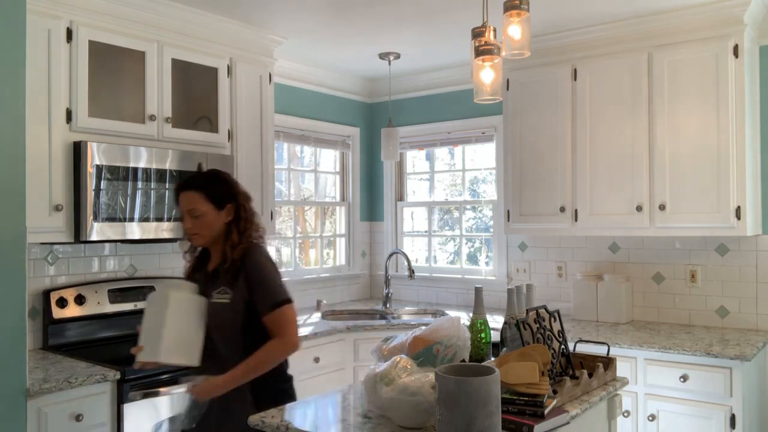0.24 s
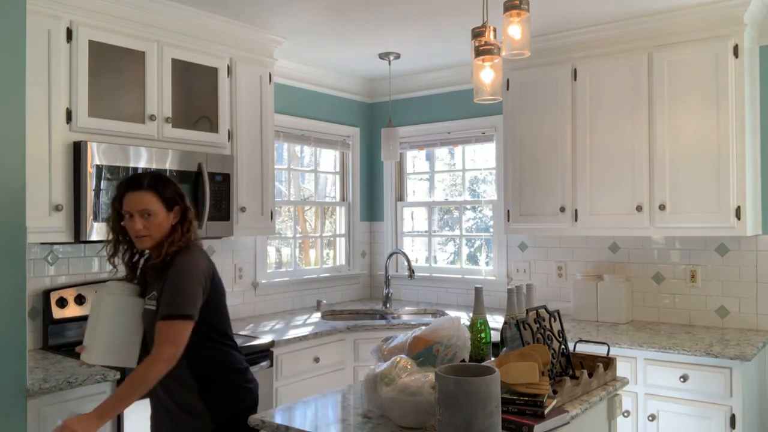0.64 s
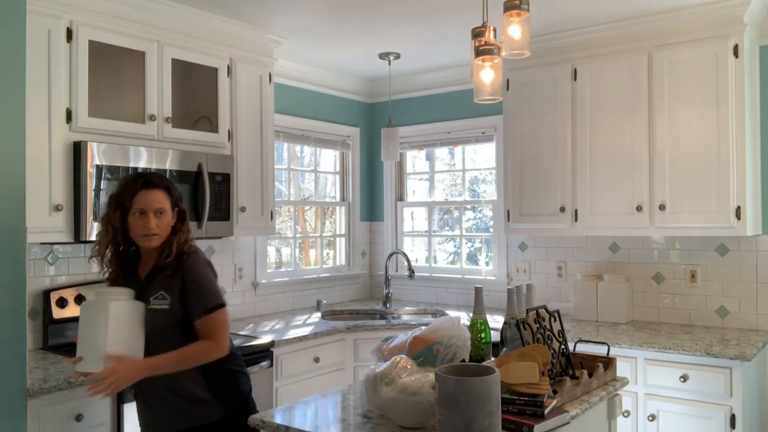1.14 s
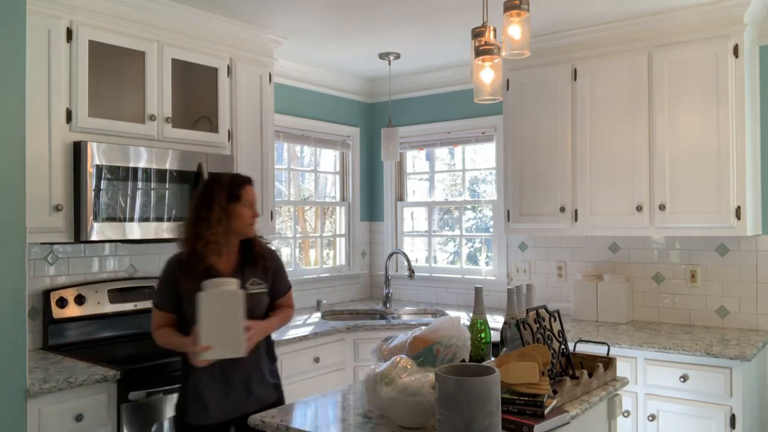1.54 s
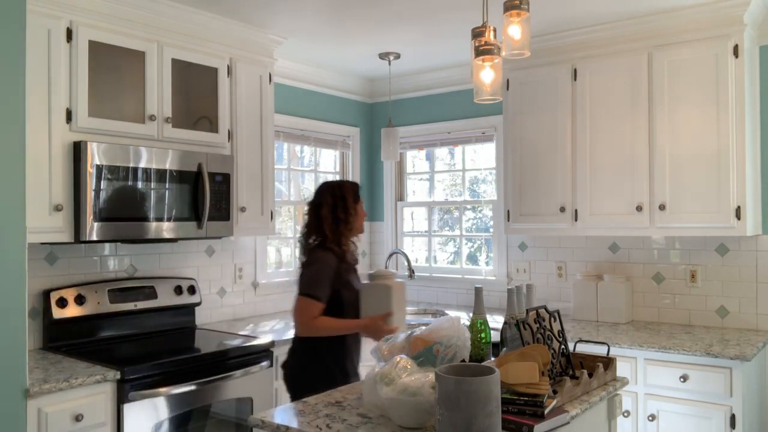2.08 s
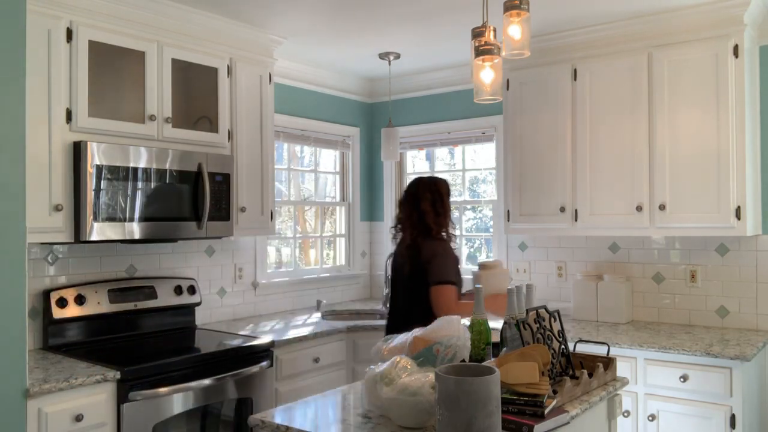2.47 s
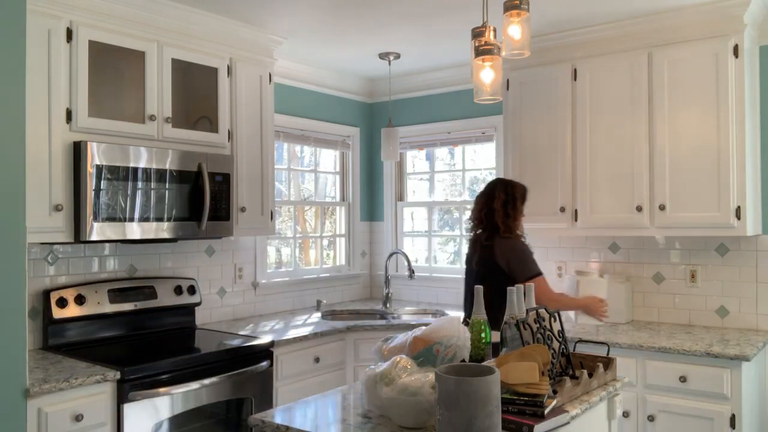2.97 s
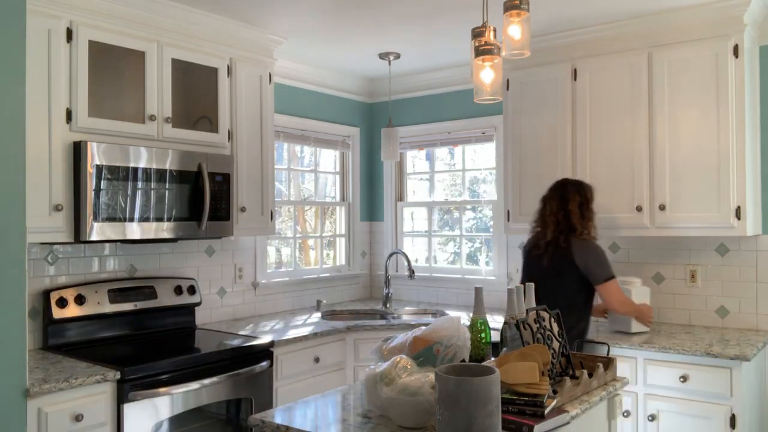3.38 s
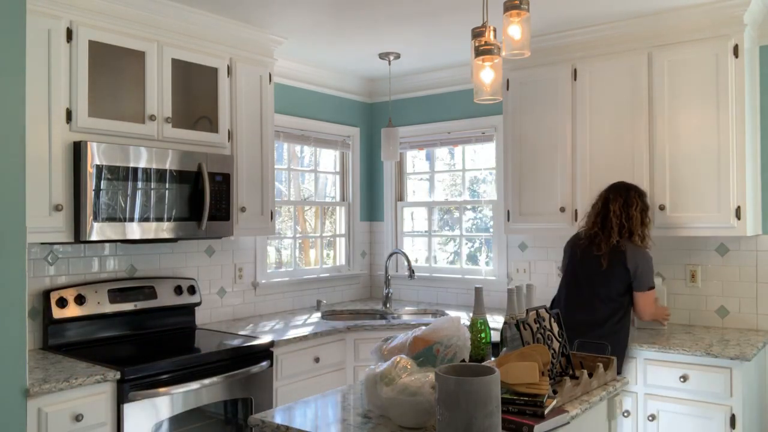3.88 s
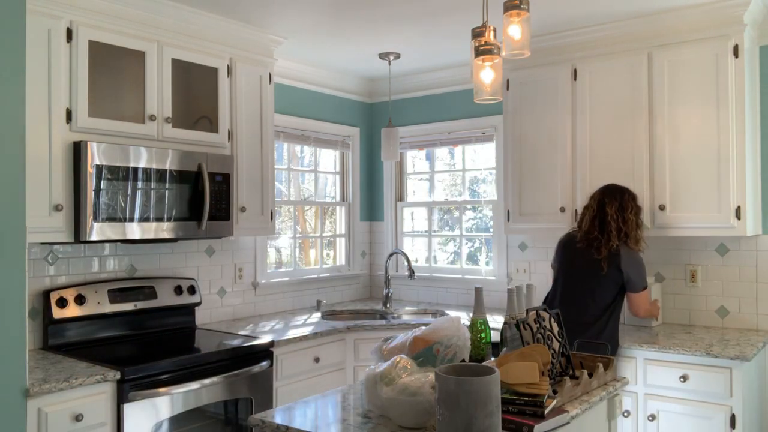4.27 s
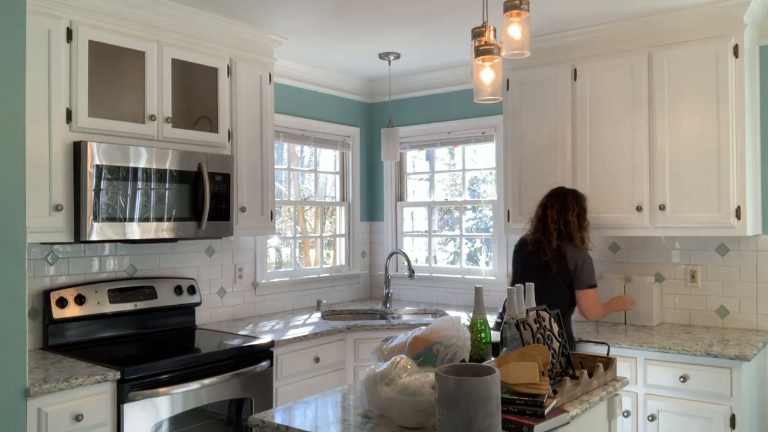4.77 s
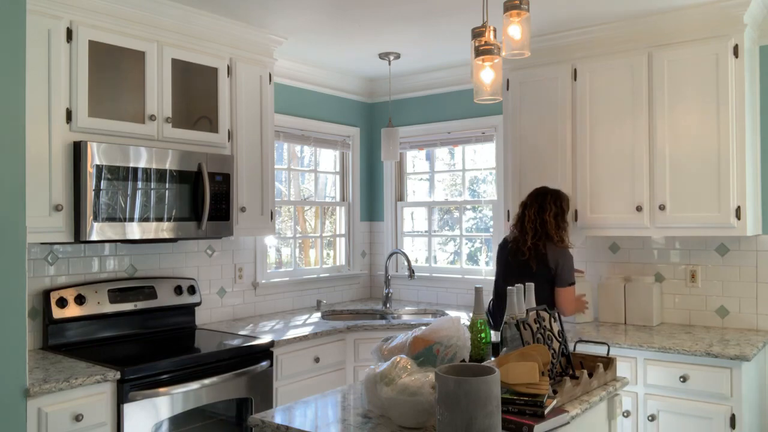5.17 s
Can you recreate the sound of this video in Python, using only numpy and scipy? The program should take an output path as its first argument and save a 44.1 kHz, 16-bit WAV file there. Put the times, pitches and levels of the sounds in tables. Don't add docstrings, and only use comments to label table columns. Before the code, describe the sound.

Quiet echoing kitchen: fabric rustle, wooden thump, then hard ceramic knocks on stone with short rings and brief gritty scrapes.

```python
import sys
import numpy as np
from scipy import signal
from scipy.fft import rfft, irfft, next_fast_len
from scipy.io import wavfile
from scipy.ndimage import map_coordinates

SR = 44100
rng = np.random.default_rng(int(sys.argv[2]) if len(sys.argv) > 2 else 0)


def magnitude_from_level(level_db):
    exponent = np.asarray(level_db, float) / 20
    return 10 ** exponent


def output_pcm(signal):
    pcm = np.clip(np.atleast_2d(signal).T, -1, 1) * 32767
    wavfile.write(sys.argv[1], SR, np.round(pcm).astype(np.int16))


N = 239145
TIME = np.arange(N) / SR
STRIKE_TIME = TIME[:SR // 2]


def unit(x):
    return x / np.sqrt(np.mean(x ** 2) + 1e-20)


def along(points, hz):
    f, v = np.transpose(points)
    return np.interp(np.log(hz + 1), np.log(f + 1), v)


def wobble(rate_hz):
    knots = rng.standard_normal(int(N * rate_hz / SR) + 4)
    return map_coordinates(knots, [TIME * rate_hz])


def coloured(x, spectrum, tilt_db=0):
    m = 2 * next_fast_len(len(x) // 2 + 4096)
    hz = np.fft.rfftfreq(m, 1 / SR)
    gain_db = along(spectrum, hz) + tilt_db * np.log2(hz / 1000 + .05)
    cepstrum = irfft(np.log(magnitude_from_level(gain_db)), m)
    cepstrum[1:m // 2] *= 2
    response = np.exp(rfft(cepstrum[:m // 2], m))
    return irfft(rfft(x, m) * response, m)[:len(x)]


def ringing(modes, damp, scatter_db):
    t = STRIKE_TIME[:, None]
    hz, db, t60_s = np.transpose(modes)
    level_db = db + scatter_db * rng.standard_normal(len(hz))
    decay = magnitude_from_level(level_db - 60 * t / (damp * t60_s))
    rise = 1 - np.exp(-t / .0005)
    return np.sum(decay * np.sin(2 * np.pi * hz * t) * rise, axis=1)


def damped_tones(lines, t60_s):
    ring = ringing([(hz, db, 1) for hz, db in lines], t60_s, scatter_db=1.5)
    return ring / np.linalg.norm(ring)


def puff(spectrum, t60_s, tilt_db=0):
    burst = rng.standard_normal(SR // 2) * magnitude_from_level(-60 * STRIKE_TIME / t60_s)
    x = coloured(burst, spectrum, tilt_db)
    return x / np.linalg.norm(x)


def strokes(rows, rise_s, grows_db, fade_db_per_s):
    start, length, *levels = np.transpose(rows)[..., None]
    t = TIME - start
    swell_db = grows_db * np.clip(t / length - 1, -1, 0)
    fade_db = fade_db_per_s * np.maximum(t - length, 0)
    shape = np.clip(t / rise_s, 0, 1) * magnitude_from_level(swell_db - fade_db)
    return [np.sqrt(np.sum((shape * magnitude_from_level(db)) ** 2, axis=0)) for db in levels]


# f/Hz, t60/s
ROOM_DECAY = [(60, 0.38), (250, 0.68), (1000, 0.69), (3000, 0.58), (6000, 0.46), (14000, 0.24)]


def room(x, wet_db, nearer=0):
    hz, t, z = signal.stft(rng.standard_normal(SR), SR, nperseg=256)
    decay = magnitude_from_level(-60 * t / along(ROOM_DECAY, hz)[:, None])
    tail = signal.istft(z * decay, SR, nperseg=256)[1][:SR]
    onset = np.minimum(TIME[:SR] / 0.00091, 1)
    tail = magnitude_from_level(wet_db) * tail * onset / np.linalg.norm(tail)
    tail[0] = 1
    out = signal.fftconvolve(x, tail)
    out[:len(x)] += nearer
    return out


def add(out, s, x):
    part = out[round(s * SR):][:len(x)]
    part += x[:len(part)]


# t/s, peak level/dB, ceramic ring level/dB, brightness/dB, knock f/Hz
SET_DOWN = [(3.442, -26, -42, -6, 1060), (3.45, -4, -15, 0.5, 890), (3.456, -8, -7.5, 0.5, 924),
            (3.464, -9.5, -12, -1, 1264), (3.487, -33, 1, 3, 930), (3.508, -19.5, -4, -4.5, 1280),
            (3.5265, -11.5, -6.5, 2.5, 405), (3.579, -34, -31, -4, 404)]
SETTLE = [(3.674, -8.5, -6, 0.5, 870), (3.681, -10.5, -0.5, 0.5, 840), (3.699, -14, -6, -4, 266),
          (3.726, -11, -2.5, 2, 302), (3.778, -11.5, -4.5, -1.5, 384), (3.829, -18.5, -2, -5.5, 464),
          (3.847, -23, -1.5, 1, 300), (3.919, -22.5, -11, -4, 394)]
PUSH_BACK = [(4.403, -29, -4, 0, 960), (4.433, -20.5, -35, -3, 368), (4.4665, -3, -11, -1.5, 507),
             (4.4735, -5.5, -15, -1, 470), (4.495, -10.5, -7, -4.5, 1155), (4.502, -12.5, -21, -7, 670),
             (4.538, -23, -3, -2, 716), (4.611, -19.5, -10, 2, 1580), (4.618, -15, -27, -1.5, 903),
             (4.67, -24, -12, 0, 950), (4.685, -16, -19, 2, 1640), (4.705, -21, -24, -3, 1110),
             (4.729, -24.5, -14, -4, 1520), (4.9, -26, -27, -4.5, 424), (5.25, -46, -19, -3, 415),
             (5.319, -50, -15, -12, 810)]
# f/Hz, level/dB per Hz
COUNTER = [(24, -103), (40, -18.5), (400, 10.5), (2250, -10), (2480, -17.5), (4300, -12.5), (5960, -26),
           (7460, -25), (15800, -45.5)]
CORNER = [(24, -50), (40, -29), (230, -10.5), (255, -2.5), (327, -4), (711, -1), (1060, -6), (1200, -3.5),
          (1580, -8.5), (1710, -8.5), (4640, -23.5), (15800, -53)]
# f/Hz, level/dB
JAR = [(1292, -46), (1324, -43), (1453, -51), (1518, -43), (1707, -52), (1787, -40), (1852, -39),
       (1916, -46), (2035, -48), (2116, -48), (2153, -40), (2299, -41), (2336, -54), (2772, -56),
       (2896, -36), (3031, -41), (3106, -49), (3171, -61), (3257, -41), (3510, -42.5), (3725, -50),
       (3924, -57), (4199, -30), (4242, -47), (4285, -54), (4334, -54), (4430, -42), (4732, -36),
       (5130, -46), (5286, -39), (5593, -63), (5846, -66), (6309, -64), (6498, -63), (6756, -57),
       (6885, -50), (7176, -48), (7569, -46), (7720, -48.5), (8242, -70), (8742, -65), (9119, -51),
       (9841, -65), (10137, -69), (10756, -68), (11138, -73), (12618, -71), (13986, -67)]
LID = [(1195, -43.5), (1249, -51), (1324, -39.5), (1448, -43), (1502, -62), (1707, -46), (1793, -42.5),
       (1884, -41), (2040, -44.5), (2116, -49), (2191, -34.5), (2304, -46), (2514, -58), (2665, -56),
       (2832, -48.5), (2896, -40), (3095, -42), (3138, -44), (3198, -41.5), (3230, -43), (3262, -47),
       (3564, -44), (3725, -58), (3935, -63), (4107, -60), (4226, -38.5), (4350, -39.5), (4398, -45),
       (4727, -45), (5028, -48.5), (5152, -54), (5378, -54.5), (5405, -46), (5561, -60), (5900, -65),
       (6212, -61), (6352, -62), (6412, -52), (6525, -57), (6767, -51), (6848, -54), (7063, -52),
       (7101, -47.5), (7203, -56), (7273, -54), (7375, -56), (7564, -64), (7693, -47.5), (8253, -72),
       (8963, -57), (9103, -63), (9964, -59), (10487, -64), (10745, -69), (12602, -69), (13997, -77)]
NEIGHBOUR = [(1179, -38.5), (1211, -44), (1335, -46), (1427, -44), (1556, -44), (1717, -45), (1809, -62),
             (1895, -57), (2019, -49), (2105, -53), (2288, -43.5), (2649, -49), (2891, -61), (3149, -55),
             (3505, -46.5), (3575, -49), (3844, -52), (3941, -54), (4264, -60), (4360, -50.5), (4576, -60),
             (4748, -57), (5163, -64), (5405, -50), (5523, -52), (5674, -67), (6525, -64), (6837, -58),
             (6966, -56), (7644, -53), (8317, -73), (8436, -59), (8624, -72), (9372, -68), (9825, -80),
             (10309, -79), (10707, -72), (11283, -80), (12064, -81), (13431, -81)]


def canister(contacts, surface, lines, ring_db, t60_s, facing_db):
    out = np.zeros(N)
    for s, db, clink_db, bright_db, knock_hz in contacts:
        knock = puff(surface, t60_s=.02, tilt_db=np.clip(bright_db + 2.5, -6, 3))
        tone = damped_tones([(knock_hz, 0)], t60_s=0.046)
        ring = magnitude_from_level(clink_db + ring_db) * damped_tones(lines, t60_s)
        direct = magnitude_from_level(3.0) * tone + magnitude_from_level(facing_db) * ring
        hit = room(knock + magnitude_from_level(-8) * tone + ring, wet_db=8.5, nearer=direct)
        add(out, s, magnitude_from_level(db + 6.5) * hit)
    return out


# t/s, length/s, scrape level/dB, ring level/dB
SLIDE_FIRST = [(3.97, 0.061, -37.5, -50), (4.14, 0.048, -33.5, -62), (4.27, 0.15, -43.5, -66)]
SLIDE_SECOND = [(4.402, 0.04, -42, -50), (4.59, 0.024, -25.5, -36), (4.66, 0.029, -22, -28.5)]
SLIDE_THIRD = [(4.8, 0.1, -31, -61), (4.93, 0.1, -36, -58.5), (5.1, 0.13, -50.5, -71.5),
               (5.24, 0.29, -42.5, -66)]
# f/Hz, level/dB per Hz
SCRAPE = [
    [(35, -21), (60, -19.5), (648, -4.5), (711, -4), (1610, -21), (1770, -13.5), (2620, -32), (7150, -37),
     (15800, -54)],
    [(35, -47), (60, -24), (216, -37), (345, -12), (940, -5.5), (1060, -8), (1160, 1.5), (2450, -23.5),
     (5670, -22.5), (15800, -54)],
    [(35, -32), (60, -24), (618, 0), (1680, -18), (1890, -41), (3020, -28), (7500, -23), (14400, -42),
     (15800, -72)],
]
# f/Hz, level/dB
THIRD = [(1577, -72), (1863, -65), (2121, -73), (2229, -77), (2681, -78), (2885, -86), (3241, -84),
         (3278, -83), (3467, -82), (3564, -84), (3747, -78), (3844, -80), (4748, -84), (4823, -84),
         (5006, -83), (5050, -85), (5582, -84), (5749, -88), (6869, -88), (7122, -90), (7219, -87),
         (7386, -87), (7537, -86), (7822, -90), (8791, -96), (9781, -93), (10357, -97), (10546, -90),
         (10772, -97), (11283, -100)]


def sliding(rows, surface, lines, ring_db, t60_s, tilt_db, grows_db, fade_db_per_s):
    push, clink = strokes(rows, 0.0065, grows_db, fade_db_per_s)
    grains = unit(rng.standard_normal(N) * magnitude_from_level(3.9 * wobble(90)))
    scrape = push * unit(coloured(grains, surface, tilt_db))
    ring = signal.fftconvolve(grains * clink * magnitude_from_level(ring_db), damped_tones(lines, t60_s))[:N]
    return magnitude_from_level(-9.0) * room(scrape + ring, wet_db=-1.0)[:N]


# t/s, peak level/dB, slap level/dB, panel tone level/dB, panel f/Hz
SHUT = [(2.252, -21.5, 3, -2, 248), (2.254, -15.5, -5, 2.5, 516), (2.265, -14, -5, 1.5, 492),
        (2.277, -7.5, -8.5, 1, 356), (2.297, -7, -9.5, -11, 733), (2.319, -13.5, -6.5, -3, 256),
        (2.344, -11, -16.5, -4.5, 273)]
# f/Hz, level/dB per Hz
PANEL = [(24, -43), (40, -14), (65, -1.5), (174, -7.5), (264, -1.5), (487, -10), (704, -6.5), (796, -12),
         (1180, -12), (1700, -17.5), (4530, -26.5), (14000, -69)]
# f/Hz, level/dB, t60/s
CARCASS = [(74.6, -6, 0.44), (260, 2, 0.3), (573, 0.5, 0.11)]


def cupboard():
    out = np.zeros(N)
    for s, db, slap_db, tone_db, panel_hz in SHUT:
        blow = puff(PANEL, t60_s=0.047, tilt_db=0.39 * (slap_db + 13.5))
        tone = magnitude_from_level(tone_db) * damped_tones([(panel_hz, 0)], t60_s=0.038)
        boom = magnitude_from_level(-22.0) * damped_tones([(75, 0)], t60_s=0.52)
        hit = room(blow + magnitude_from_level(-3.5) * tone + boom, wet_db=5.5, nearer=magnitude_from_level(1.5) * tone)
        add(out, s, magnitude_from_level(db + 9.0) * hit)
    carcass = ringing(CARCASS, damp=1, scatter_db=3.5) * np.minimum(STRIKE_TIME / 0.0043, 1)
    add(out, SHUT[1][0], magnitude_from_level(-25.5) * carcass)
    return out


# t/s, peak level/dB, slap level/dB
STEPS = [(0.183, -35.5, -10.5), (0.258, -40.5, -1), (0.357, -53, 5), (0.873, -36, -12), (0.978, -33.5, -11),
         (1.352, -32.5, -10), (1.59, -41, -5.5), (1.722, -30.5, -6.5), (1.775, -31, -20), (2.057, -49.5, 7),
         (2.714, -44, -5), (3.049, -48, -4), (4.255, -35, -40), (5.197, -40, -18)]
# f/Hz, width/Hz, level/dB
BOARDS = [(81.4, 34.5, 5.5), (254, 26, -5)]


def steps():
    out = np.zeros(N)
    boards = [(hz, db, 1.66 / width_hz) for hz, width_hz, db in BOARDS]
    soft_onset = np.minimum(STRIKE_TIME / 0.016, 1)
    for s, db, slap_db in STEPS:
        thud = ringing(boards, damp=1.51, scatter_db=2.5)
        slap = magnitude_from_level(slap_db + 22.5) * puff(CORNER, t60_s=0.15, tilt_db=2.0)
        add(out, s, magnitude_from_level(db - 2.5) * room((thud + slap) * soft_onset, wet_db=3.5))
    return out


# t/s, length/s, level/dB, crispness/dB
RUBS = [(0, 0.039, -58.5, -7), (0.065, 0.27, -50.5, -8.5), (0.401, .03, -51, -7), (0.476, 0.11, -50.5, -7),
        (0.668, 0.14, -65.5, 0.5), (0.813, 0.12, -53.5, -6.5), (1, 0.11, -63, -8), (1.216, 0.11, -64.5, -8),
        (1.34, 0.042, -61.5, -11), (1.445, 0.07, -70, -7), (1.53, 0.2, -58, -10), (2.02, 0.072, -55.5, -13),
        (2.153, .03, -60.5, -11), (2.3, 0.22, -62.5, -16), (2.638, 0.1, -64, -8), (2.807, 0.043, -67, -12),
        (2.868, 0.025, -61, -11.5), (3.048, .05, -69, -23), (3.12, 0.027, -88, -12),
        (3.35, 0.091, -66.5, -15), (3.8, 0.24, -66, -8), (4.093, 0.23, -70, -10), (4.706, 0.039, -55.5, -4),
        (4.836, 0.14, -58.5, -14.5), (5.24, 0.16, -82, -15)]
# t/s, level/dB
SNAPS = [(0.058, -48), (.124, -52), (.255, -42), (.417, -48), (1.215, -53), (1.246, -56), (1.296, -47),
         (1.443, -61), (1.592, -66), (2.655, -55), (3.128, -62), (4.295, -55), (5.24, -66)]
# f/Hz, level/dB per Hz
CLOTH = [(350, -1), (600, -5), (768, -17), (1350, -10), (1770, -1), (2780, -2), (7650, 1.5), (8420, -4),
         (15800, -14)]


def clothes():
    rest_db, snap_t60_s = -85.5, 0.018
    rows = [(s, length, db, db + crisp_db) for s, length, db, crisp_db in RUBS]
    low, high = strokes(rows, rise_s=0.0056, grows_db=5, fade_db_per_s=111)
    crackle_db = 0.21 * wobble(25.7) + 1.54 * wobble(300)
    rub = rng.standard_normal((2, N)) * magnitude_from_level(crackle_db)
    crisp = unit(coloured(rub[1], [(7000, -1.5), (8500, 2.0), (16000, -3.5), (17000, -32)]))
    dull = unit(coloured(coloured(rub[0], CLOTH), [(6500, 21.0), (8200, 17.0), (9500, -26)]))
    snap = sum(magnitude_from_level(db - 60 * np.abs(TIME - s) / snap_t60_s) * (TIME >= s) for s, db in SNAPS)
    dull_gain = magnitude_from_level(-1.0) * low + magnitude_from_level(rest_db) + magnitude_from_level(-11) * snap
    crisp_gain = magnitude_from_level(4.5) * high + magnitude_from_level(rest_db - 2) + magnitude_from_level(-9) * snap
    return dull_gain * dull + crisp_gain * crisp


# f/Hz, level/dB per Hz
AIR = [(15, -40), (25, -5), (96, -4), (152, -13), (205, -6), (308, -12), (528, -15), (637, -21), (710, -17),
       (2890, -31.5), (3490, -31.5), (4330, -31.5), (14200, -63), (15800, -60)]
# f/Hz, level/dB
HUM = [(99, -60.5), (199, -62), (445, -67.5)]
# start t/s, end t/s, f/Hz, level/dB
LID_RING = [(.95, 1.45, 1780, -67), (2.02, 2.2, 4250, -66), (2.62, 3.1, 3750, -69)]


def background():
    out = magnitude_from_level(-53.0) * unit(coloured(rng.standard_normal(N), AIR)) * magnitude_from_level(0.3 * wobble(8.5))
    for hz, db in HUM:
        level = magnitude_from_level(db + 1.5 + 2.4 * wobble(22))
        out += level * np.sin(2 * np.pi * hz * TIME + .5 * wobble(12))
    for start, end, hz, db in LID_RING:
        swell = np.sin(np.pi * np.clip((TIME - start) / (end - start), 0, 1))
        level = swell * magnitude_from_level(db + 2.5 * wobble(28.47))
        out += level * np.sin(2 * np.pi * hz * TIME + 1.5 * wobble(74))
    return out


def scene():
    knocks = canister(SET_DOWN, COUNTER, JAR, ring_db=6.5, t60_s=0.11, facing_db=2.5)
    knocks += canister(SETTLE, COUNTER, LID, ring_db=5.5, t60_s=0.11, facing_db=-9.0)
    knocks += canister(PUSH_BACK, CORNER, NEIGHBOUR, ring_db=0.7, t60_s=0.1, facing_db=3.5)
    slides = sliding(SLIDE_FIRST, SCRAPE[0], LID, ring_db=6.0, t60_s=0.12,
                     tilt_db=-0.5, grows_db=5.0, fade_db_per_s=90)
    slides += sliding(SLIDE_SECOND, SCRAPE[1], NEIGHBOUR, ring_db=-4.5, t60_s=0.11,
                      tilt_db=-0.8, grows_db=2.0, fade_db_per_s=111)
    slides += sliding(SLIDE_THIRD, SCRAPE[2], THIRD, ring_db=12, t60_s=.17,
                      tilt_db=-2.5, grows_db=-1.5, fade_db_per_s=250)
    quiet = cupboard() + steps() + clothes() + background()
    return (knocks + slides + quiet)[None]


def low_pass(x):
    return signal.sosfilt(signal.butter(12, 15960, fs=SR, output="sos"), x)


def record(dry):
    microphone = [(15, -50), (40, -5.5), (60, 3.5), (15700, 1.0), (15900, -51)]  # f/Hz, level/dB
    mix = coloured(dry[0], microphone)[None]
    return low_pass(mix)


dry = scene()
out = record(dry)
output_pcm(out)
```